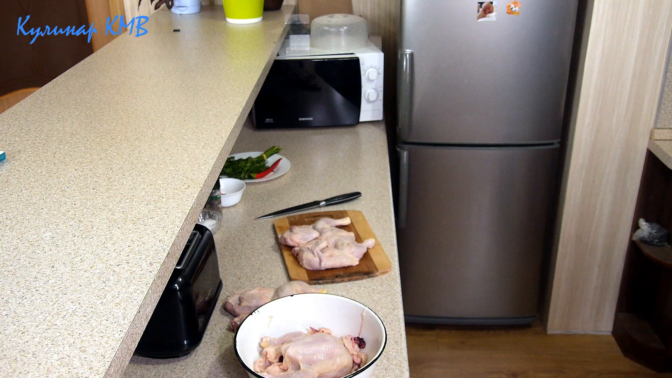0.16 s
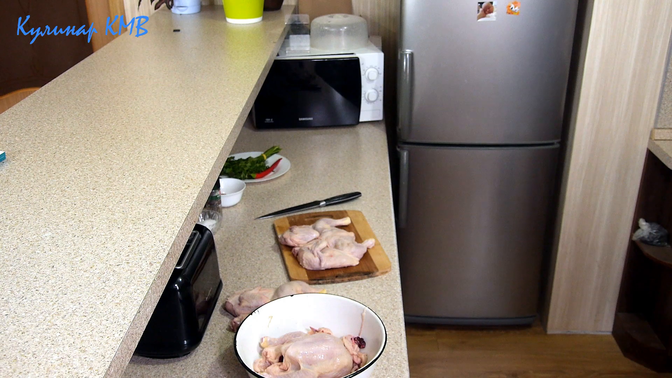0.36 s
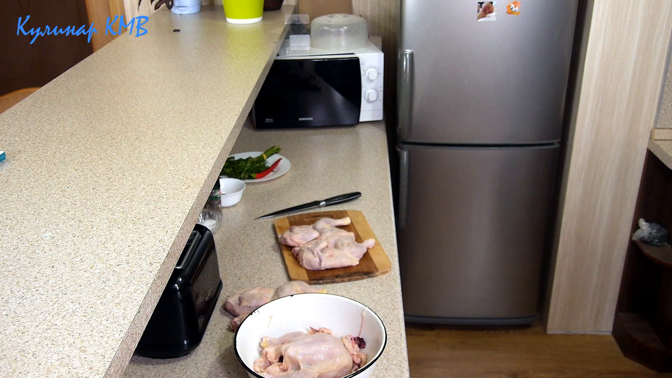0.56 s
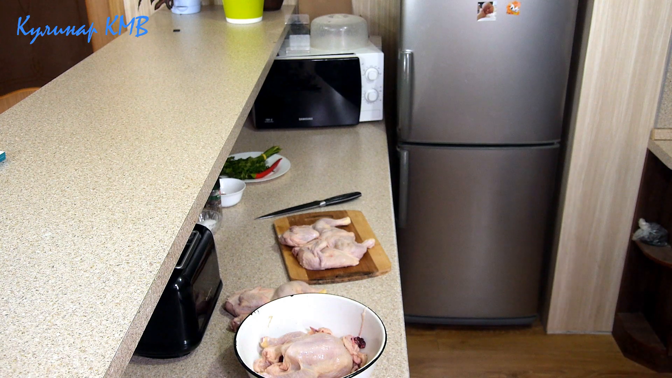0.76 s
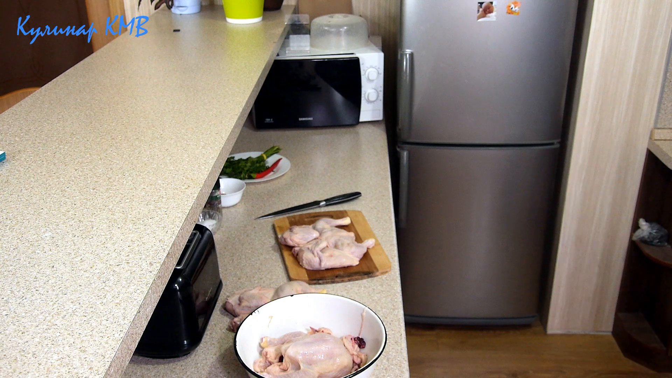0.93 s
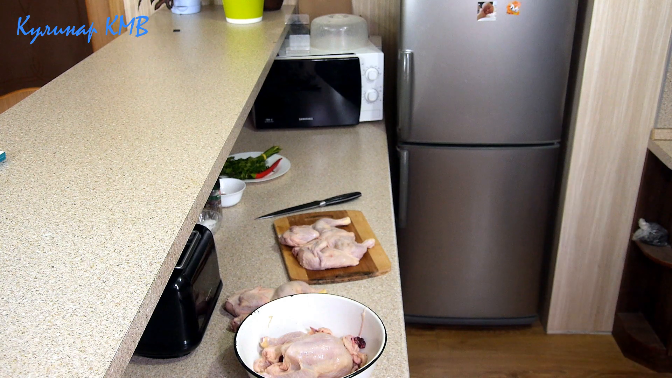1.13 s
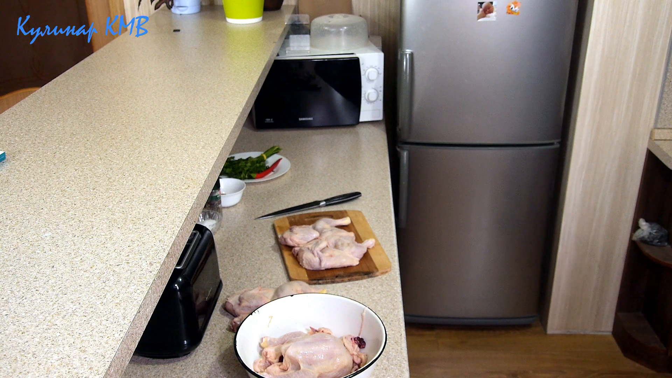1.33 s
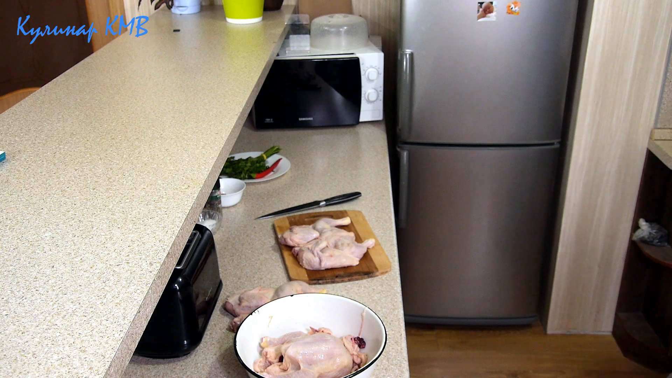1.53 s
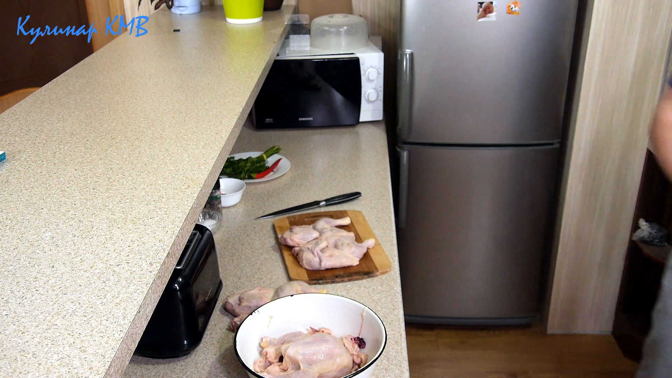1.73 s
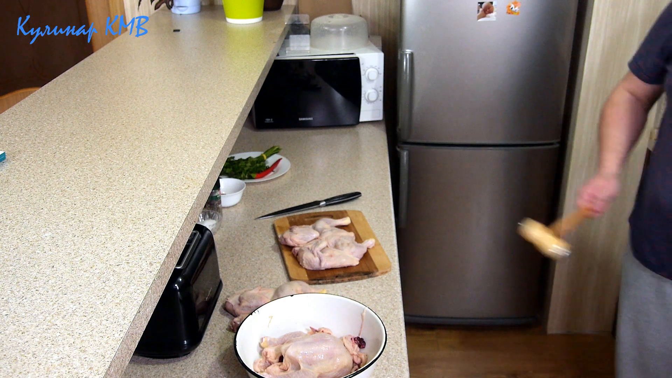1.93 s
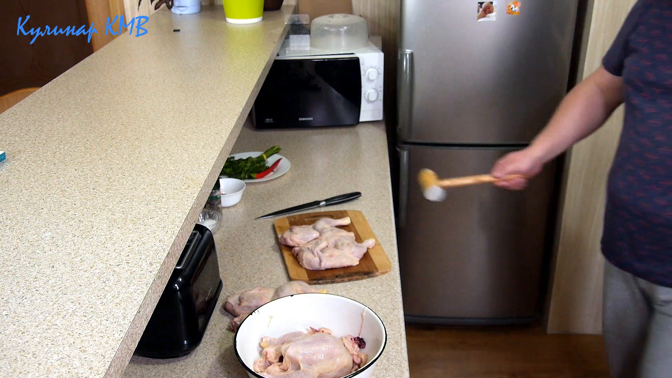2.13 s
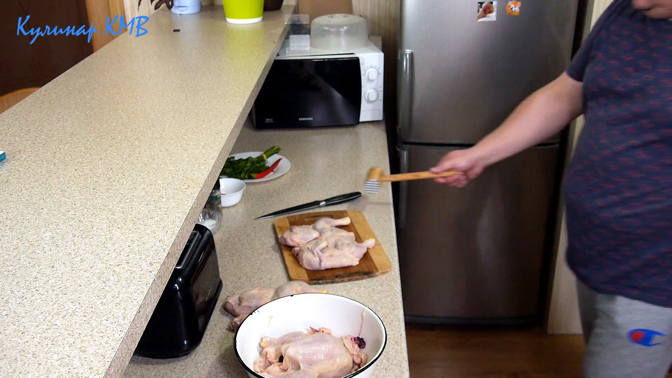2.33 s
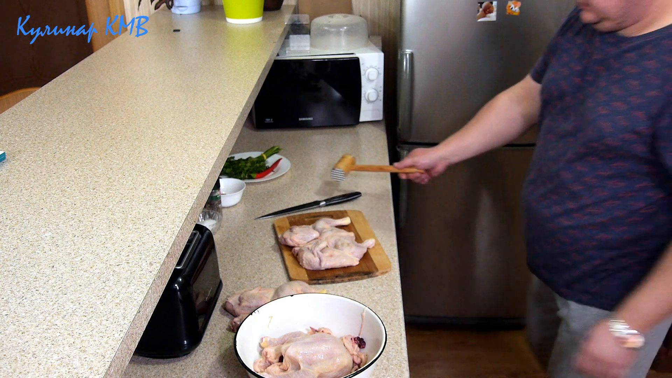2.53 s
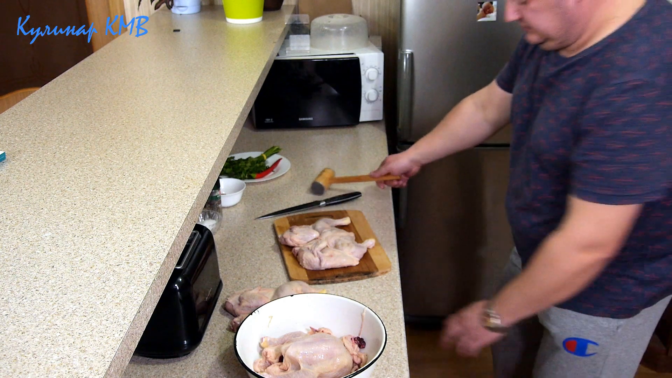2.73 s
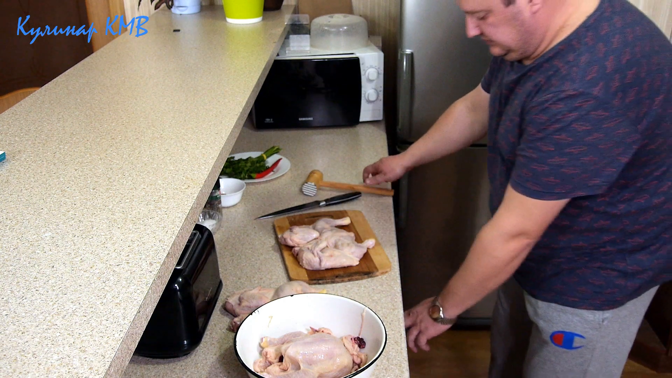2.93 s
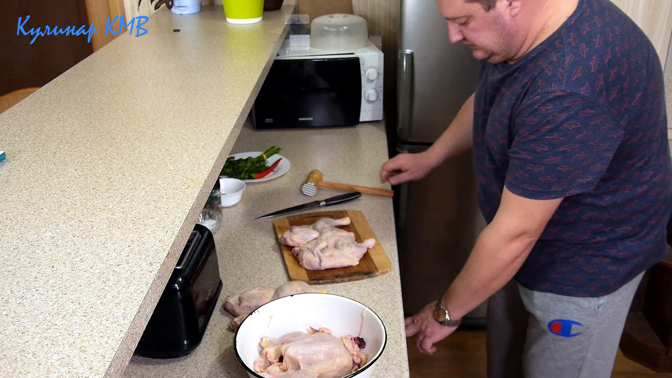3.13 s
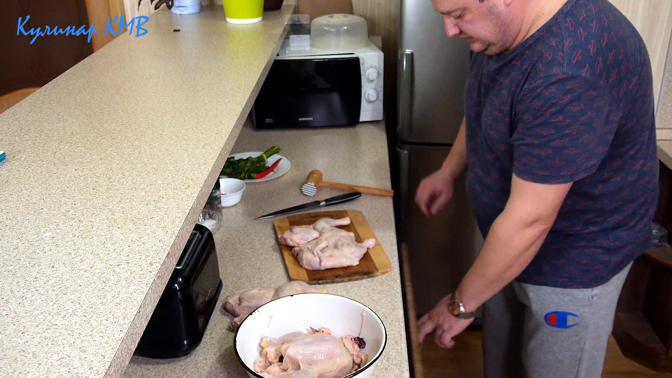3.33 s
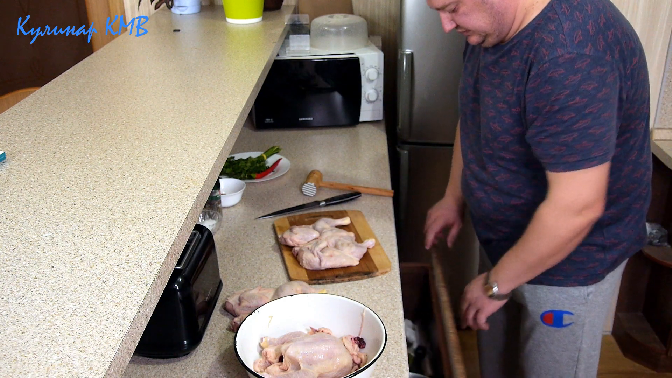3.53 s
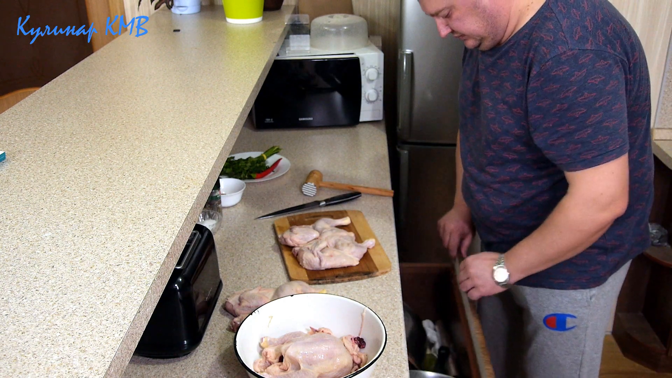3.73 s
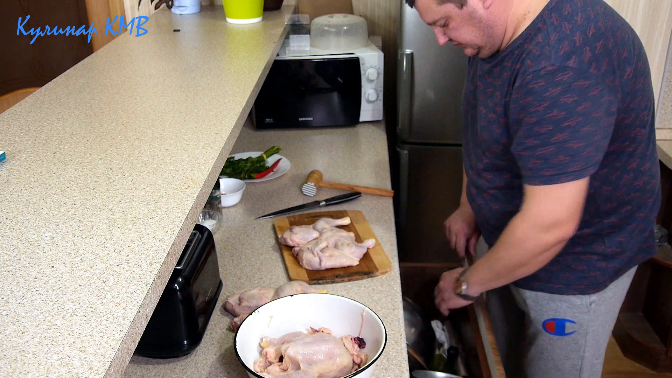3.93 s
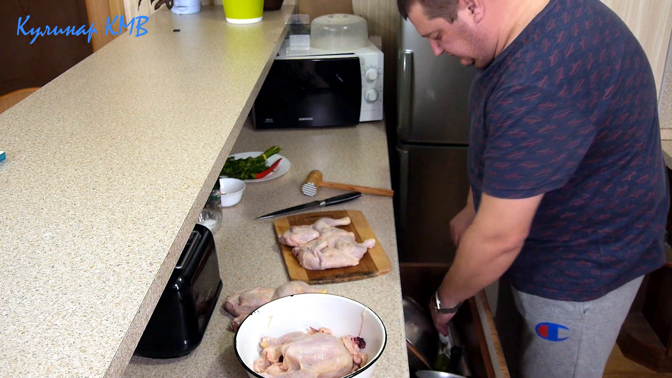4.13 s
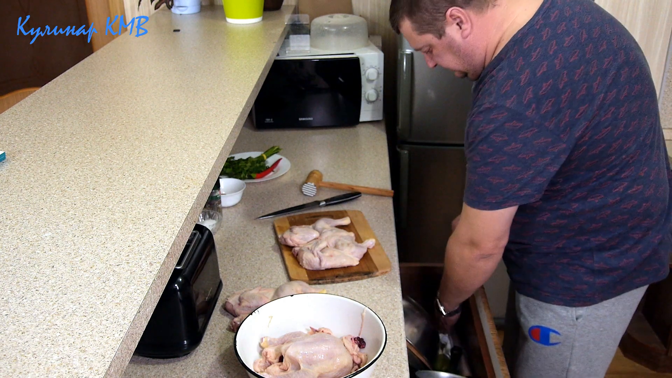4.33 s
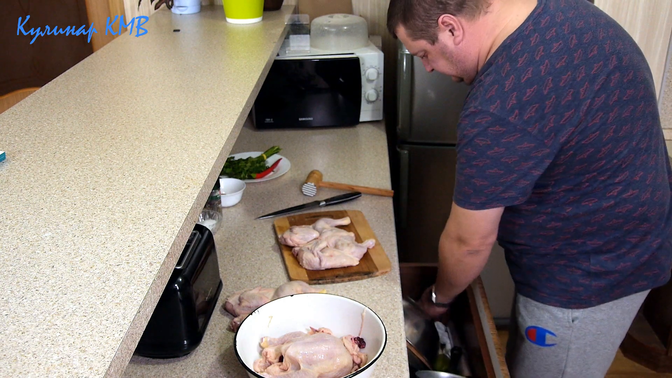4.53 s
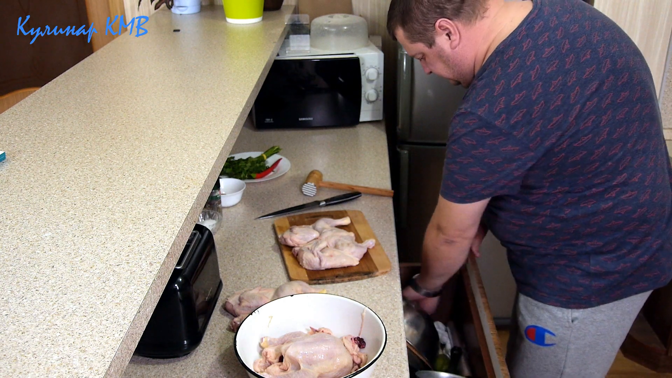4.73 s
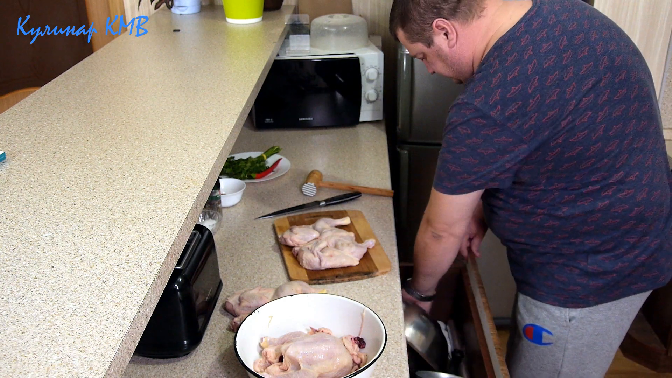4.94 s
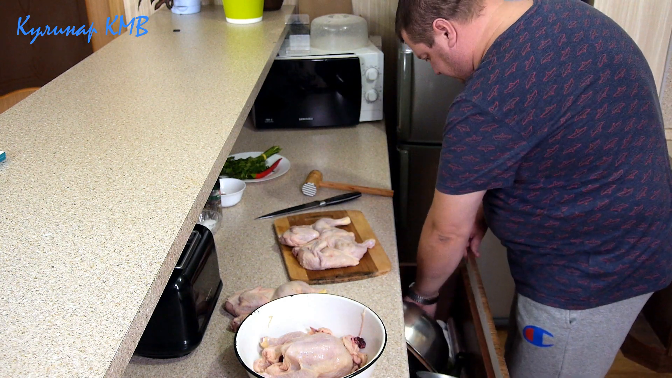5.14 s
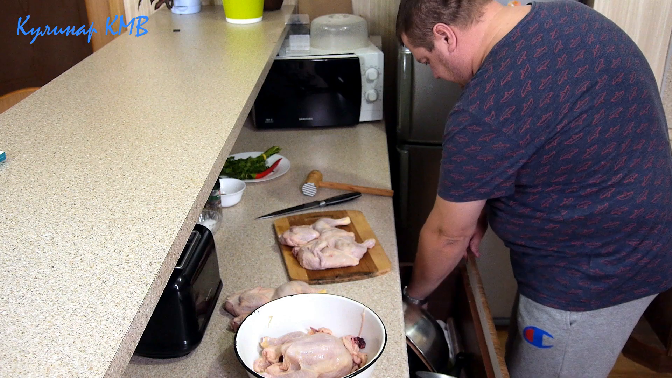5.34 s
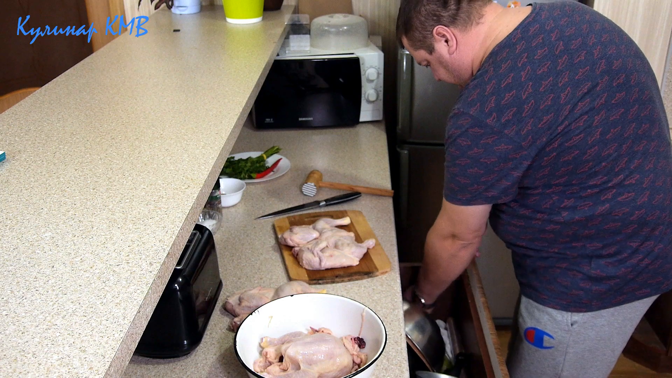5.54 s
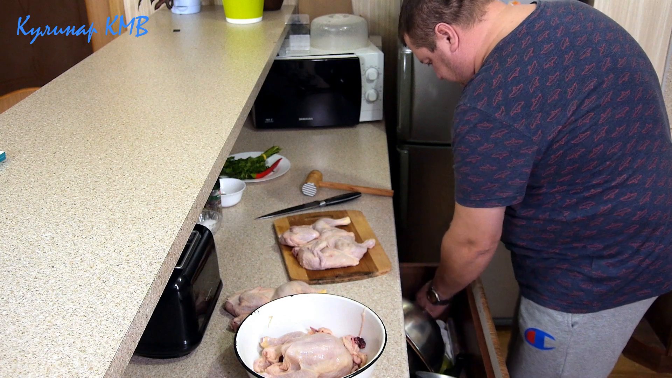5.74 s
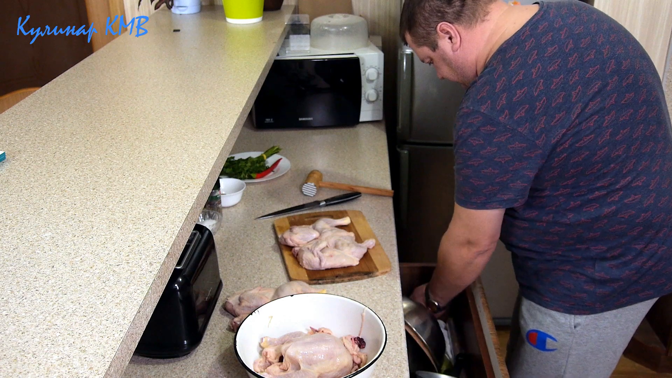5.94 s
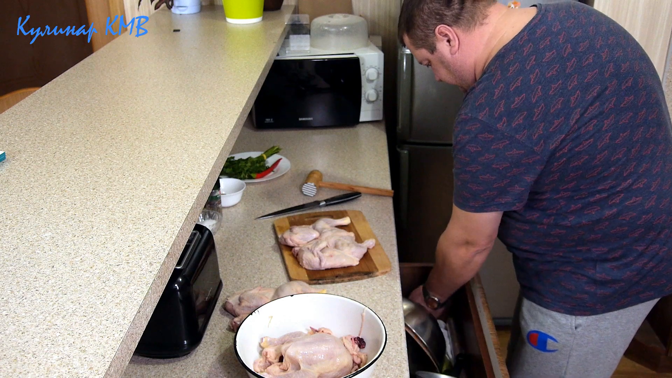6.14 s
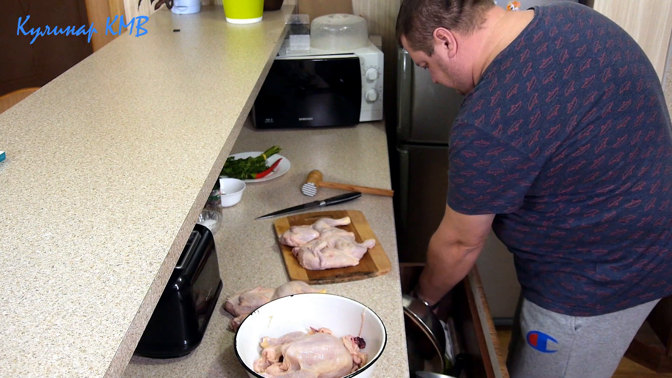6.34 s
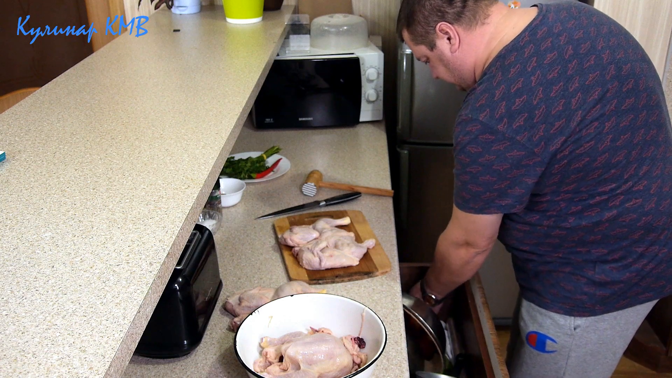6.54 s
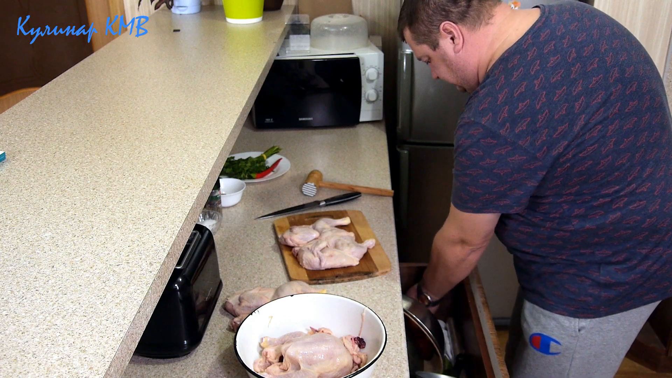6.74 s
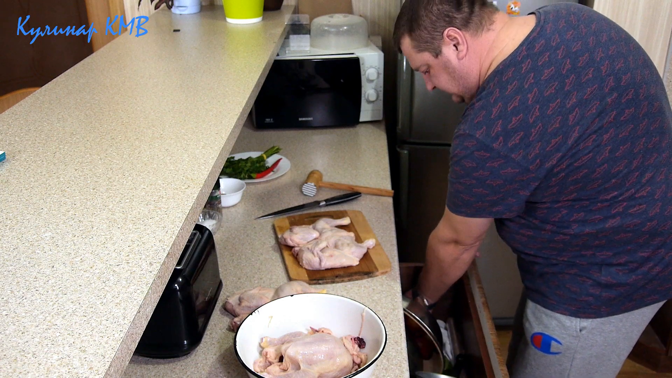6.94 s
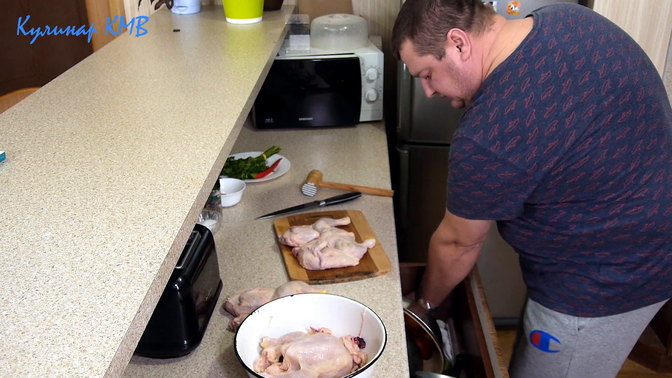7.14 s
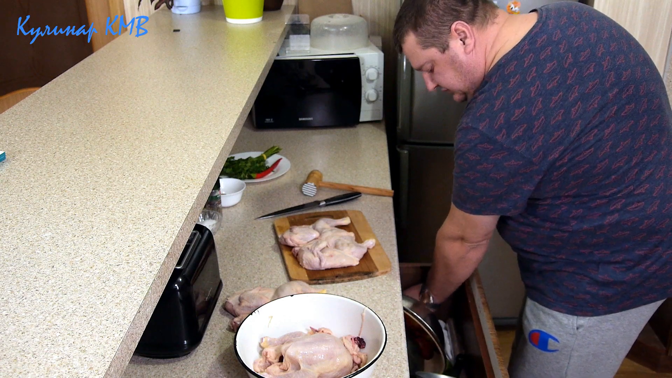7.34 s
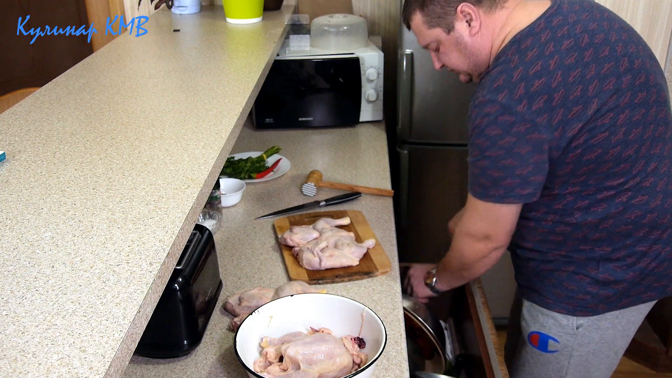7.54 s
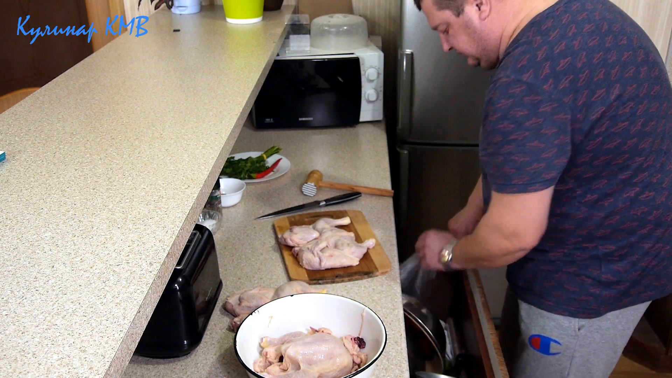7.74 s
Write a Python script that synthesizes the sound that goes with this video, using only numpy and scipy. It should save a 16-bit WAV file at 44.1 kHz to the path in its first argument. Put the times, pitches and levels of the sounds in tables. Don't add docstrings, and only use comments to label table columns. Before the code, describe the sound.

A small, hard-walled kitchen with quiet room hiss and low refrigerator hum, heard by a stereo microphone pair at a little distance. From 0 to 0.6 s, cutlery rattles brightly and densely, slightly to the right; a thin rising runner squeak sings around 0.45-0.7 s. Duller drawer bumps come at 0.8 and 1.0 s, with a clunk at 1.2 s. Faint ticks and cloth movement follow. At 2.77 s a wooden mallet hits the worktop hard, bouncing in shrinking knocks until 3.0 s, with a brighter metal tap at 2.94 s. A drawer rolls open softly around 3.2-3.8 s, leaving a quiet low drone. At 4.92 s pans crash loudly together, jingling until 5.1 s. Then plastic crinkles and pots and lids knock lightly, notably at 5.4 and 6.27 s, with rummaging growing busier from 7.5 s to the end at about 7.8 s.

```python
import sys
import numpy as np
from scipy import signal
from scipy.fft import rfft, irfft
from scipy.io import wavfile
from scipy.ndimage import uniform_filter1d

SR = 44100
rng = np.random.default_rng(int(sys.argv[2]) if len(sys.argv) > 2 else 0)


def transcribe(signal):
    frames = np.atleast_2d(signal).T
    limited = np.clip(frames, -1, 1)
    pcm = np.round(limited * 32767).astype(np.int16)
    wavfile.write(sys.argv[1], SR, pcm)


def volts(x):
    e = np.asarray(x, float) / 20
    return 10 ** e


N = 343098

# frequency_hz, level_db
AIR_SPECTRUM = [(20, -12), (59, -6), (97, -8.5), (170, -7), (249, -14.5), (394, -13.5), (439, -7.5),
                (516, -12), (734, -14.5), (1700, -25), (14800, -29), (16000, -38)]
AIR_DB = -61.5
# frequency_hz, correlation (0 to 1)
AIR_LIKENESS = [(30, .4), (60, 0.69), (240, 0.58), (950, 0.31), (3770, 0.16), (15000, 0.15)]
# frequency_hz, level_db
HUM_LINES = [(48.4, -71), (172.3, -70), (441.4, -74)]
# time_s, level_db
DRONE_LEVEL = [(0, -24), (3.7, -20.5), (3.95, 4), (4.601, -6), (5.8, -6.5), (6.8, 4.5), (7.78, 1.5)]

# frequency_hz, level_db (per Hz)
BOARD_SPECTRUM = [(60, -50), (110, -25.5), (170, -9), (237, -2.5), (339, -1.5), (450, -3.5), (1500, -18.5),
                  (2200, -60.5)]
SCRAPE_SPECTRUM = [(240, -37.5), (400, -13.5), (884, -8), (1600, -7.5), (3880, -16), (5000, -13.5),
                   (6500, -51), (11000, -120)]
RUSTLE_SPECTRUM = [(1180, -23.5), (2000, -7), (5250, -2), (7510, 1), (13600, -8.5), (15200, -14.5),
                   (16000, -39)]
# frequency_hz, width_hz, level_db
PAN_RESONANCES = [(323, 10, -3.5), (504, 3.5, -8.5), (1130, 25, -1), (1228, 11, 1.5), (1605, 28, -2.5),
                  (2096, 13, -16.5), (2430, 16, -8), (3743, 30, -12), (4630, 37, -7.5), (6480, 34, -1)]
# time_s, level_db
RATTLE_EFFORT = [(0.0, -42.5), (0.13, -40.5), (0.29, -45), (0.45, -40), (0.5, -36.5), (0.6, -43.5),
                 (0.71, -59), (0.82, -55.5), (1.16, -63.5)]
WALK_EFFORT = [(1.2, -60.5), (1.4, -80), (1.94, -67.5), (2.5, -72), (2.75, -67.5)]
ROLL_EFFORT = [(3.2, -63), (3.27, -65.5), (3.45, -58), (3.58, -52), (3.67, -53.5), (3.79, -63.5),
               (4.0, -67.5), (4.25, -77), (4.75, -70)]
RUMMAGE_EFFORT = [(4.55, -87), (4.78, -72), (4.885, -55.5), (4.93, -39.5), (5.2, -59), (5.41, -52),
                  (5.59, -48), (5.8, -56.5), (6.06, -53.5), (6.21, -57), (6.45, -50.5), (6.74, -59.5),
                  (6.96, -52), (7.14, -53.5), (7.48, -49.5), (7.6, -46), (7.69, -46.5), (7.78, -43.5)]
# boards_db, scrape_db, rustle_db
RATTLE_STIRS = (-6, 0.1, -7)
WALK_STIRS = (0.1, -3.5, -7.5)
ROLL_STIRS = (0.091, -4, -9)
RUMMAGE_STIRS = (-15.5, -10.5, 0.13)
# peak_s, length_s, boards_db, scrape_db
LOAD_SHIFTS = [(0.896, 0.87, -56.5, -72), (1.25, 0.075, -58, -82), (3.207, 0.09, -84, -58),
               (5.115, 0.18, -37, -47), (5.67, 0.22, -71.5, -63), (6.07, 0.19, -51.5, -58.5),
               (6.438, 0.75, -62.5, -63.5), (6.596, 0.12, -71, -62), (7.595, 0.12, -56, -50),
               (7.78, 0.14, -60, -59)]
# peak_s, length_s,
# level_db
SWISHES = [(1.77, 0.21, -71), (2.495, 0.49, -70), (4.68, 0.17, -62), (5.56, .12, -61),
           (7.25, .14, -59), (4.86, .1, -64)]
SHIFT_DROP_DB = 13

# start_s, blow_db, thud_db, jingle_db
CUTLERY_CLASHES = [(0.029, -25.5, -21, -8), (0.069, -27.5, -15, -2), (0.134, -27, -15, -3),
                   (0.268, -26, -22, -3), (0.289, -32, -27, -1.5), (0.354, -28.5, -8, -0.5),
                   (0.384, -31.5, -7, 1), (0.447, -23.5, -9.5, -5), (0.505, -21.5, -31, -2.5),
                   (0.552, -23, -22, -8), (0.78, -27, -17, -3), (1.025, -42, -7, -14),
                   (1.039, -37.5, -9, -4.5)]
SNAP_CLASHES = [(1.221, -33, -7, -13), (1.53, -62.5, -5, 7), (1.715, -56.5, -10, -1), (4.2, -63.5, -10, 7),
                (5.015, -25, -19, 11), (0.398, -37, -20, -2), (0.46, -24, -15, -2), (0.478, -30, -24, 2),
                (0.492, -27, -20, 3), (0.522, -37, -17, -2), (0.537, -32, -22, -1),
                (0.575, -29.5, -22, 5.5), (0.592, -35, -20, -6), (0.1, -38, -12, -1), (0.16, -34, -19, 1),
                (0.19, -39, -14, 1.5), (6.273, -27, -11, -7), (6.258, -46, -12, -8), (0.135, -33, -15, 2),
                (0.077, -33, -20, 0), (0.503, -30, -22, 8), (7.2, -50, -15, 0), (7.567, -36, -12, 4),
                (5.5, -48, -15, 7)]
TICK_CLASHES = [(1.793, -49.5, -13, -4), (2.387, -55, -5, 2.5), (2.565, -48, -16, -6.5),
                (2.779, -36, -31, 9.5), (3.431, -38.5, -38, -4), (3.614, -36.5, -17, -13),
                (4.63, -55, 3, -22), (4.768, -56, -20, -14), (4.812, -42, -9, -30), (2.765, -40, -30, 8)]
PAN_CRASH = [
    (4.916, -8, -27, -7.5),
    (4.924, -9, -19.5, -2.5),
    (4.944, -11, -17, -11),
    (4.975, -15.5, -23, -15),
    (4.933, -17, -23, -16),
    (4.995, -29, -11, -23),
    (5.054, -31.5, 2, 10.5),
    (5.084, -20, -7, -33),
    (5.114, -26.5, -4, -18),
]
RUMMAGE_KNOCKS = [(5.385, -38, 4, 2), (5.403, -26.5, -4, -8), (5.569, -50, -21, -8), (5.739, -45.5, -18, 2),
                  (5.804, -47, -13, 2.5), (5.967, -48.5, -12, 2), (6.069, -49.5, -1, -2),
                  (6.117, -46, 2, 2.5), (6.219, -43, -20, -16), (6.271, -27.5, -1.5, -3.5),
                  (6.299, -34.5, -21, -9), (6.438, -41.5, 9, -20), (6.541, -42.5, -22, -2),
                  (6.611, -39, -6.5, -27), (6.717, -39.5, -1.5, 4.5), (7.03, -45, -10.5, -3.5),
                  (7.515, -33, -5.5, -11), (7.527, -35, -13, -15), (7.566, -33.5, -6, 4.8),
                  (7.585, -32, -12, -11), (7.772, -31.5, -6.5, -9)]
# sparkle_db (relative to jingle), t60_s (of the chatter)
CUTLERY_KIND = (-12, 0.15)
SNAPS_KIND = (-11.5, 0.047)
TICKS_KIND = (-16, 0.1)
CRASH_KIND = (-14.5, 0.082)
KNOCKS_KIND = (-10, 0.13)
# frequency_hz, level_db
CLASH_SPECTRUM = [(59, -57.5), (100, -23), (180, -10), (260, -9), (340, 1.5), (676, -3.5), (1550, -4),
                  (2470, -6), (8460, -13), (11600, -19), (14300, -27), (16000, -41)]
# frequency_hz, level_db
CLASH_UNLIKE = [(500, -16.5), (2000, -10.5), (6000, -9.5), (12000, -2)]
# time_s, left_right_db
HAND_PLACE = [(0, -6.5), (1.3, -4.5), (4.9, 0), (7.78, 0)]

# (the boards' 62 Hz mode, struck at 2.5 and 2.6 s, gives
SPOONS = [(3200, -5.5, 0.04), (4100, -3.5, 0.091), (4300, -14, 0.027), (4520, 4.5, 0.038), (6600, -1, 0.13),
          (7600, -5.5, 0.29)]
SPOONS_HIT = [(0.07, -35, 4560), (0.269, -25, 4200), (0.275, -31, 4400), (0.27, -36, 6700),
              (0.292, -27, 3200), (0.292, -36, 4500), (0.289, -37, 6700), (0.781, -38, 8200),
              (1.039, -50, 4600), (0.03, -44, 7600), (0.385, -42, 7000)]
FORKS = [(2240, -7, 0.15), (2700, -3.5, 0.11), (3540, 0.5, 0.1), (5260, -6.5, .05), (6550, -3.5, 0.079),
         (8600, -12.5, 0.064)]
FORKS_HIT = [(0.07, -37, 8600), (0.455, -36, 6600), (0.492, -31, 6450), (0.52, -37, 2700),
             (0.535, -39, 5900), (0.57, -38, 8000), (0.575, -35, 2500), (0.59, -32, 5450),
             (5.015, -29, 5700), (5.11, -39, 5000)]
DRAWER_BOARDS = [(62, 0, .3), (139.7, 0.5, 0.17), (180, -1, 0.22), (246.4, -2, 0.226), (333.8, -0.7, 0.24)]
DRAWER_BOARDS_HIT = [(0.09, -34.5, 350), (0.781, -37, 351), (1.028, -37.5, 260), (1.044, -41, 245),
                     (1.222, -40, 240), (3.59, -41, 230), (3.451, -50, 132), (3.701, -47.5, 129),
                     (4.918, -24.5, 368), (4.888, -48, 343), (2.5, -62, 60), (2.6, -62, 60),
                     (3.82, -56, 135), (5.11, -38, 200), (6.12, -47, 200), (4.922, -35, 130),
                     (5.389, -42, 130), (5.084, -36.5, 148), (6.069, -41, 352), (6.271, -44, 173),
                     (6.716, -47, 195), (7.311, -48, 353), (7.563, -45.5, 180)]
BOWL = [(962, -3, 0.093), (1513, 0.5, 0.086), (4900, -2, 0.045)]
BOWL_HIT = [(1.221, -39, 900), (1.232, -48, 900), (1.275, -51, 900), (7.201, -41.5, 1400),
            (7.255, -50, 1513), (7.566, -43, 4900), (7.59, -47, 1513)]
HOOK = [(1280, 0.1, .65), (3420, 0.00037, 0.46)]
HOOK_HIT = [(1.794, -67.5, 1280), (2.02, -67.5, 1280), (1.79, -71, 3400), (2.1, -80, 3400)]
MALLET_HEAD = [(2017, 4.5, 0.1), (5140, 4.5, 0.08), (5200, -7, 0.25), (5300, -9, .22), (5410, 0, 0.09),
               (5500, -3, .08)]
MALLET_HEAD_HIT = [(2.7645, -47, 5330), (2.937, -26, 2210), (2.937, -29, 5300), (2.98, -39, 5300),
                   (3.0206, -35.5, 5210)]
TRAY = [(339, 6, .15), (1210, 0, .12), (1430, 0, .12), (1910, 0, .12)]
TRAY_HIT = [(4.812, -56, 1600), (4.818, -54, 340), (4.822, -53, 1400), (4.835, -55, 1700)]
PAN = [(900, -1.5, 0.17), (1140, -0.8, 0.11), (1553, 3, 0.14), (1740, -5, 0.034), (2092, 1, 0.063),
       (6370, -3, 0.06), (8400, -4, .055)]
PAN_HIT = [(4.917, -17, 2050), (4.935, -22, 6400), (4.94, -38, 4400), (4.944, -28, 1100),
           (5.02, -29.5, 1500), (5.016, -23.5, 9700), (5.1, -36, 1950), (5.09, -32.5, 830),
           (5.225, -51, 1460)]
POT = [(269.5, 0.079, 0.25), (520, 1, 0.46), (730, 1.3, 0.19), (1110, 16, 0.12), (1490, 2.7, 0.23),
       (2000, 4.6, 0.25)]
POT_HIT = [(5.39, -31, 290), (5.41, -46, 1700), (5.428, -52, 1200), (5.51, -62, 1100), (5.445, -42, 300),
           (5.66, -57, 650), (5.403, -37, 620), (5.63, -50, 520)]
LID = [(397, -1, 0.11), (811, 0, 0.07), (992, -10, 0.39), (1185, -4, 0.08), (1520, -3, .07),
       (2900, -3, .04), (4840, 0.5, 0.054)]
LID_HIT = [(6.031, -53, 920), (6.117, -50, 4700), (6.271, -33, 1300), (6.282, -33, 1050),
           (6.272, -43, 2900), (6.271, -43, 4900), (6.312, -36, 820), (6.372, -46, 950), (6.118, -53, 2900),
           (6.05, -52, 1400), (6.438, -34.5, 392), (6.6, -52, 1700), (7.524, -36, 1234), (7.53, -42, 394),
           (7.581, -33.5, 390)]
SPOT_DB_PER_OCTAVE = 19.5

# time_s, pitch_hz, level_db
RUNNER_NOTE = [(0.44, 1125, -56), (0.455, 1130, -37), (0.492, 1178, -37), (0.51, 1182, -43),
               (0.545, 1173, -53), (0.562, 1200, -34.5), (0.67, 1200, -46), (0.695, 1213, -58),
               (0.76, 1203, -62)]
RUNNER_ROUGHNESS = 0.25

# start_s, wood_db, face_db, thud_db
MALLET_BOUNCES = [
    (2.7649, -8, -32, -31.5),
    (2.7795, -3, -22.5, -36),
    (2.8605, -6.5, -37, -32.5),
    (2.9095, -7, -34.5, -37),
    (2.937, -11, -11.5, -33),
    (2.973, -13.5, -32, -38.5),
    (3.0, -17, -27, -36),
    (2.863, -13, -40, -40),
    (2.942, -16, -26, -40),
    (3.0215, -18, -17, -37),
]
# frequency_hz, level_db (per Hz)
WOOD_SPECTRUM = [(180, -42.5), (555, -12.5), (689, -3.5), (856, -6.5), (1300, -1.5), (1930, -6),
                 (2500, -18.5), (3100, -37.5), (4500, -42.5), (9000, -44.5), (13000, -54), (16000, -75)]
FACE_SPECTRUM = [(760, -29.5), (1300, 0), (2060, 6), (2600, -4), (3300, 2), (3900, -4.5), (4500, -12),
                 (5300, -5), (6100, -14.5), (8600, -21.5), (12000, -35), (16000, -62)]
THUD_SPECTRUM = [(60, -49), (100, -10.5), (125, -7), (180, -3), (250, -3.5), (340, -7), (450, -8),
                 (700, -38.5), (2500, -74.5), (8000, -100)]
# frequency_hz, width_hz, level_db
HANDLE_RESONANCES = [(686, 10, 2), (780, 36, -2), (940, 16, -11.5), (1127, 47, -1), (1310, 110, -11.5),
                     (1605, 67, -1.5), (2080, 61, 1)]
# frequency_hz, level_db
WORKTOP_TO_WALLS = [(300, -0.5), (800, 3.5), (1300, 0.5), (2100, -3), (3500, 2.5), (5200, -1), (9000, 1.5)]

# frequency_hz, t60_s
ROOM_T60 = [(125, 0.5), (500, 0.68), (1500, 0.63), (4000, 0.58), (9000, 0.37), (15000, 0.2)]
# frequency_hz, level_db
ROOM_UNLIKE = [(60, -11.5), (250, -11.5), (700, -10), (2000, -2), (8000, -4)]
# frequency_hz, left_right_db
TREBLE_LEAN = [(3000, 0.33), (9000, 3)]
EDGE_HZ = 16100


def evened(x):
    return x / np.sqrt(np.mean(x ** 2) + 1e-20)


def peaked(x):
    return x / abs(x).max()


def read(points, hz):
    f, value = np.transpose(points)
    return np.interp(np.log(hz + 1), np.log(f + 1), value)


def follow(points, t):
    return np.interp(t, *np.transpose(points), -120, -120)


def add(mix, s, sound):
    part = mix[..., round(s * SR):][..., :sound.shape[-1]]
    part += sound[..., :part.shape[-1]]


def panned(x, db):
    return x * volts(np.array([[db / 2], [-db / 2]]))


def colour(x, points):
    db = np.maximum(read(points, abs(np.fft.fftfreq(4096, 1 / SR))), -100)
    log_gain = np.log(volts(db))
    phase = -signal.hilbert(log_gain).imag
    response = np.fft.ifft(np.exp(log_gain + 1j * phase)).real
    taps = response[:2048] * np.hanning(4096)[2048:]
    filtered = signal.oaconvolve(np.atleast_2d(x), taps[None], axes=1)
    return filtered[..., :x.shape[-1]].reshape(x.shape)


def modes(x, table):
    out = np.zeros(x.shape)
    for hz, width, db in table:
        r = np.exp(-np.pi * width / SR)
        angle = 2 * np.pi * hz / SR
        resonance = signal.lfilter([1 - r * r], [1, -2 * r * np.cos(angle), r * r], x)
        out += volts(db) * resonance * np.sin(angle)
    return out


def grains(size, per_s, spread_db):
    size_db = spread_db * np.minimum(rng.exponential(1, size), 4)
    strength = volts(size_db) * rng.standard_normal(size)
    return evened(strength * (rng.random(size) < per_s / SR))


def clumps(length_s, depth_db):
    steps = rng.standard_normal(int(N / SR / length_s) + 2)
    return volts(depth_db * np.interp(np.arange(N) / SR / length_s, np.arange(len(steps)), steps))


def burst(t, t60):
    return rng.standard_normal(len(t)) * volts(-60 * t / t60)


def swell(t, peak_s, length_s, db):
    away = (t - peak_s) / length_s * 2
    away = np.where(away < 0, 1.3 * away, away)
    return volts(db - SHIFT_DROP_DB * np.minimum(away ** 2, 9))


def air():
    t = np.arange(N) / SR
    hz = np.fft.rfftfreq(N, 1 / SR)
    a, b = rfft(rng.standard_normal((2, N)))
    same = np.clip(read(AIR_LIKENESS, hz), 0, 1)
    ports = np.array([a, same * a + np.sqrt(1 - same ** 2) * b])
    tone = evened(irfft(ports * volts(read(AIR_SPECTRUM, hz)), N))

    lines, pure = [], []
    for f, db in HUM_LINES:
        narrow = modes(modes(rng.standard_normal(N), [(f, 4, 0)]), [(f, 8, 0)])
        lines.append(volts(db) * evened(narrow))
        pure.append(volts(db) * np.sin(2 * np.pi * f * t))
    lines[0] = 0.53 * lines[0] + volts(2.0) * pure[0]
    lines[1] = (0.35 * lines[1] + pure[1]) * volts(np.interp(t, *np.transpose(DRONE_LEVEL)))
    return volts(AIR_DB - 4.0) * tone + sum(lines) * volts([[-.8], [.4]])


def handling():
    t = np.arange(N) / SR
    body = evened(colour(grains(N, 3000, 2.0) * clumps(0.027, 0.74), BOARD_SPECTRUM))
    rub = grains(N, 9000, 1.3) * clumps(0.027, 3.6)
    sliding = evened(colour(rub, SCRAPE_SPECTRUM))
    scrape = evened(sliding + 0.26 * evened(modes(rub, PAN_RESONANCES)))
    crumples = np.array([grains(N, 14000, 2.1) for _ in range(2)])
    crinkle = colour(crumples * clumps(0.028, 1.7), RUSTLE_SPECTRUM)
    rustle = evened(crinkle + 0.28 * crinkle[::-1])

    actions = [(RATTLE_EFFORT, RATTLE_STIRS), (WALK_EFFORT, WALK_STIRS),
               (ROLL_EFFORT, ROLL_STIRS), (RUMMAGE_EFFORT, RUMMAGE_STIRS)]
    low, mid, high = sum(np.outer(volts(stirs), volts(follow(effort, t))) for effort, stirs in actions)
    for peak_s, length_s, boards_db, scrape_db in LOAD_SHIFTS:
        low = low + swell(t, peak_s, length_s, boards_db)
        mid = mid + swell(t, peak_s, length_s, scrape_db)
    high = high + sum(swell(t, *swish) for swish in SWISHES)
    return panned(low * body, 1.2) + panned(mid * scrape, 1.3) + panned(high * rustle, 1.6)


def clashes():
    out, t = np.zeros((2, N)), np.arange(SR // 4) / SR
    kinds = [(CUTLERY_CLASHES, CUTLERY_KIND), (SNAP_CLASHES, SNAPS_KIND), (TICK_CLASHES, TICKS_KIND),
             (PAN_CRASH, CRASH_KIND), (RUMMAGE_KNOCKS, KNOCKS_KIND)]
    for blows, (sparkle_db, t60) in kinds:
        fade = volts(-60 * t / np.clip(t60, .01, .4)) * np.minimum(t / 0.0024, 1)
        for s, blow_db, thud_db, jingle_db in blows:
            chatter = np.array([grains(len(t), 16000, 0.91) for _ in range(2)]) * fade
            tilt = [(400, thud_db + 10.0), (700, 0.0017), (2800, 0.017), (4800, jingle_db + 5.5),
                    (8000, jingle_db + 8.5), (12000, jingle_db + sparkle_db + 15.5)]
            add(out, s, volts(blow_db + 3.5) * colour(chatter, tilt))
    mid, side = colour(out, CLASH_SPECTRUM)
    side = colour(side, CLASH_UNLIKE)
    lean = np.interp(np.arange(N) / SR, *np.transpose(HAND_PLACE))
    return np.array([mid + side, mid - side]) * volts([lean / 2, -lean / 2])


def rings():
    out = np.zeros(N)
    pieces = [(SPOONS, SPOONS_HIT), (FORKS, FORKS_HIT), (DRAWER_BOARDS, DRAWER_BOARDS_HIT),
              (BOWL, BOWL_HIT), (HOOK, HOOK_HIT), (MALLET_HEAD, MALLET_HEAD_HIT), (TRAY, TRAY_HIT),
              (PAN, PAN_HIT), (POT, POT_HIT), (LID, LID_HIT)]
    strikes = [(piece, *hit) for piece, hits in pieces for hit in hits]
    for piece, s, strike_db, spot_hz in strikes:
        for hz, db, t60 in piece:
            below, above, phase, turn = rng.random(4)
            t = np.arange(0, np.clip(t60, .01, .7), 1 / SR)
            upper_hz = 11.0 + hz * (1.003 + 0.011 * above)
            lower_hz = hz * (.997 - 0.026 * below) - 14.
            beats = np.sin(2 * np.pi * (upper_hz * t + phase))
            beats += np.sin(2 * np.pi * (lower_hz * t + turn))
            ring = np.sin(2 * np.pi * hz * t) + min(0.14 / t60, .8) * beats
            level_db = strike_db + db - SPOT_DB_PER_OCTAVE * abs(np.log2(hz / spot_hz))
            onset = np.minimum(t / (0.00079 + 2.1 / hz), 1)
            add(out, s, volts(level_db - 60 * t / t60) * ring * onset)
    return panned(out, 1.5)


def squeak():
    t = np.arange(N) / SR
    s, hz, db = np.transpose(RUNNER_NOTE)
    turns = np.cumsum(np.interp(t, s, hz)) / SR
    rough = 1 + RUNNER_ROUGHNESS * evened(uniform_filter1d(rng.standard_normal(N), size=500))
    level = volts(np.interp(t, s, db, -120, -120) + 1.5)
    return panned(level * rough * np.sin(2 * np.pi * turns), 1.2)


def mallet():
    out, t = np.zeros(N), np.arange(SR // 3) / SR
    touch = t == 0
    slap = np.arange(len(t)) == round(.0024 * SR)
    for s, wood_db, face_db, thud_db in MALLET_BOUNCES:
        contact = touch + 0.27 * slap + 0.037 * burst(t, 0.12)
        knock = colour(contact, WOOD_SPECTRUM)
        wood = peaked(knock) + 0.22 * peaked(modes(knock, HANDLE_RESONANCES))
        face = peaked(colour(touch + 0.74 * burst(t, 0.082), FACE_SPECTRUM))
        thud = peaked(colour(burst(t, 0.19), THUD_SPECTRUM))
        add(out, s, -volts(wood_db) * wood + volts(face_db) * face + volts(thud_db) * thud)
    return panned(out, 0.98)


def tail():
    taps = np.zeros((2, SR))
    at = np.arange(120, SR - 20, 20) + rng.integers(0, 20, (2, (SR - 121) // 20))
    np.put_along_axis(taps, at, rng.choice([-1., 1.], at.shape), 1)
    hz, t, z = signal.stft(taps, SR, nperseg=256)
    z = z * volts(-60 * t / read(ROOM_T60, hz)[:, None])
    side = z[1] * volts(read(ROOM_UNLIKE, hz))[:, None]
    both = signal.istft(np.array([z[0] + side, z[0] - side]), SR, nperseg=256)[1]
    return both / np.linalg.norm(both[0])


def room(x):
    turn = np.pi * np.arange(N) / SR * 4
    out = np.zeros((2, N))
    for k in range(3):
        share = abs(np.sqrt(2 / 3) * np.cos(turn + k * np.pi / 3))
        out += signal.fftconvolve((x.mean(0) * share)[None], tail(), axes=1)[:, :N]
    return out


def scene():
    hands = handling() + squeak()
    blows, notes, knocks = clashes(), rings(), mallet()
    sent = volts(-2.5) * colour(knocks, WORKTOP_TO_WALLS) + volts(-2.0) * blows
    sent = sent + volts(-7.0) * notes + volts(-8.5) * hands
    return knocks + blows + notes + hands + air() + panned(room(sent), 1.5)


def low_pass(x):
    return signal.sosfilt(signal.butter(12, 15780, fs=SR, output="sos"), x)


def record(dry):
    lean = read(TREBLE_LEAN, np.fft.rfftfreq(N, 1 / SR))
    ports = irfft(rfft(dry) * volts([lean / 2, -lean / 2]), N)
    band_limit = signal.firwin(255, EDGE_HZ, fs=SR)
    limited = signal.oaconvolve(ports, band_limit[None], "same", axes=1)
    return low_pass(limited)


dry = scene()
out = record(dry)
transcribe(out)
```